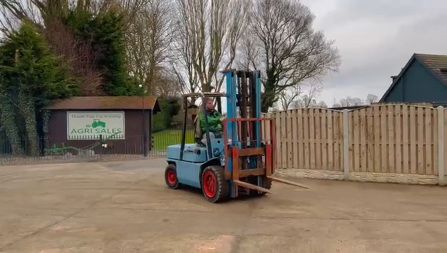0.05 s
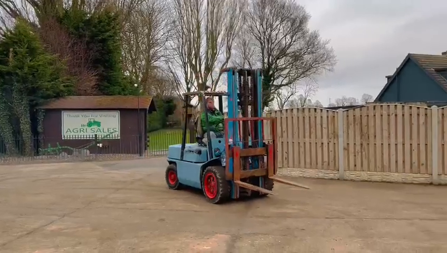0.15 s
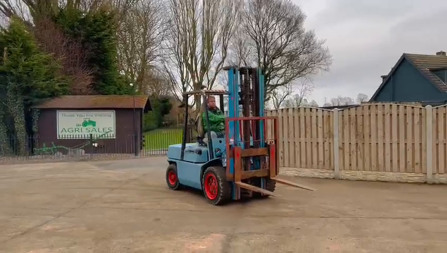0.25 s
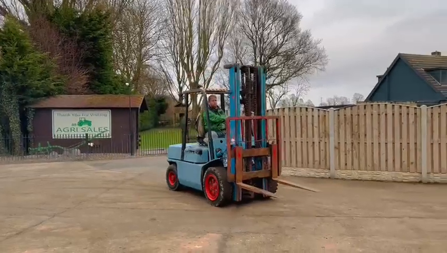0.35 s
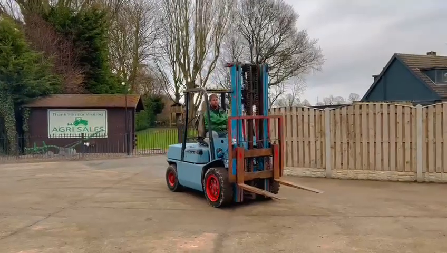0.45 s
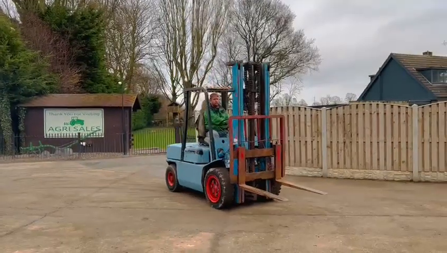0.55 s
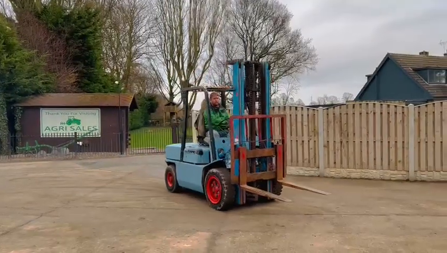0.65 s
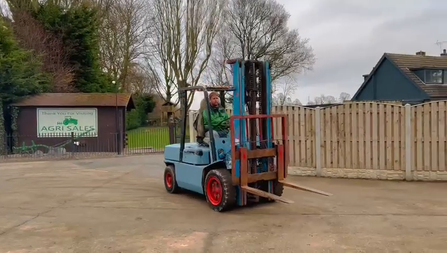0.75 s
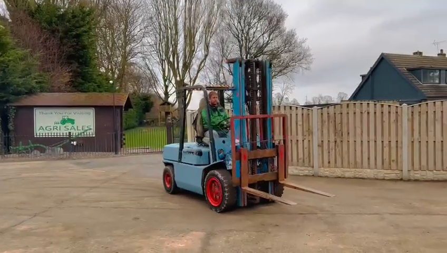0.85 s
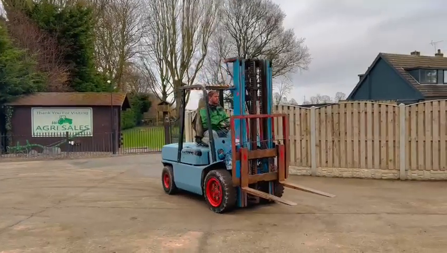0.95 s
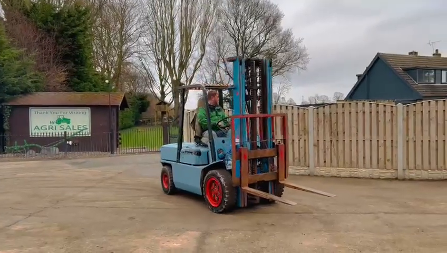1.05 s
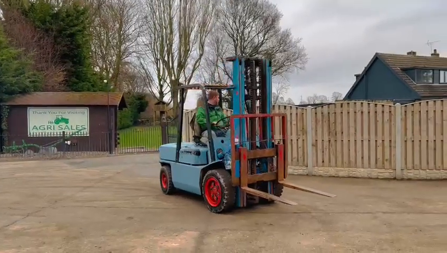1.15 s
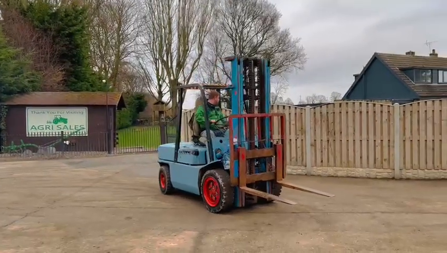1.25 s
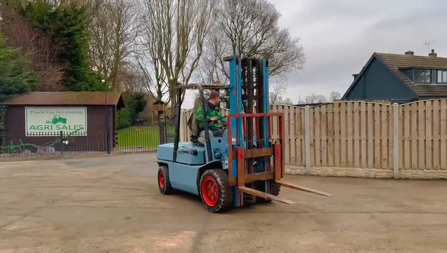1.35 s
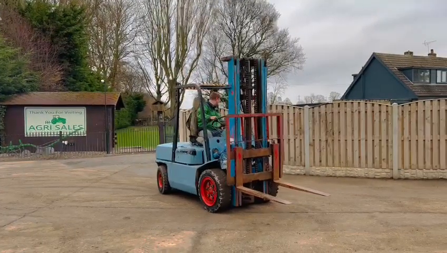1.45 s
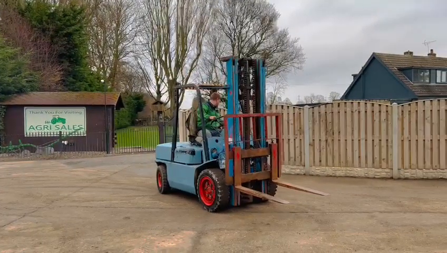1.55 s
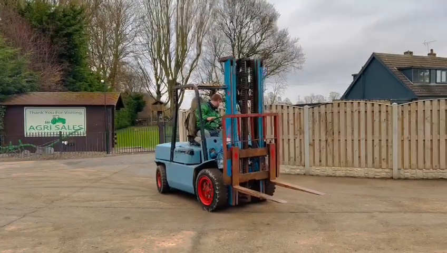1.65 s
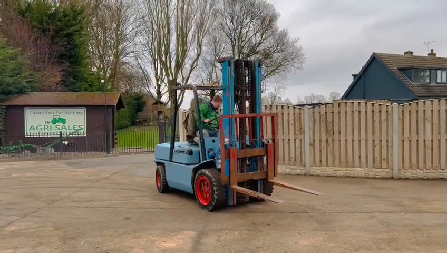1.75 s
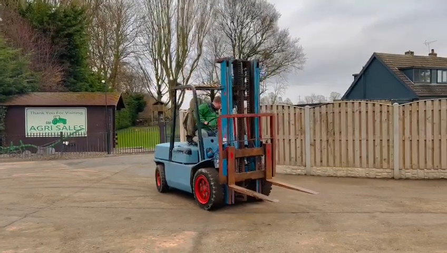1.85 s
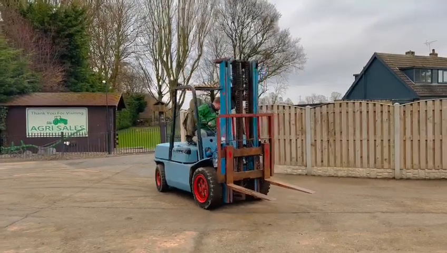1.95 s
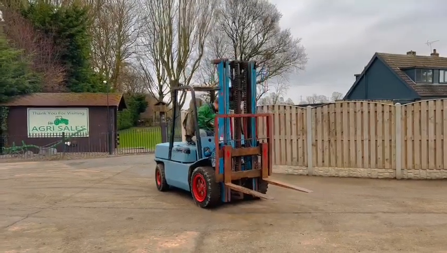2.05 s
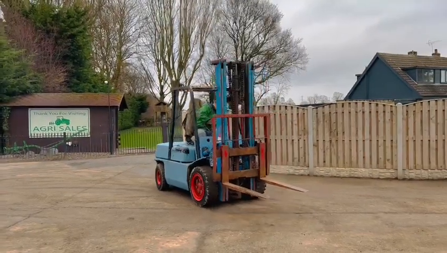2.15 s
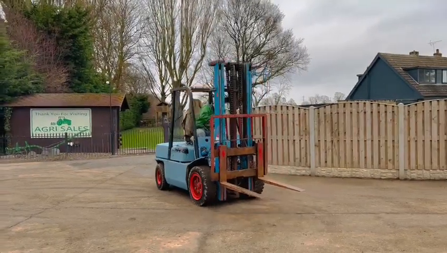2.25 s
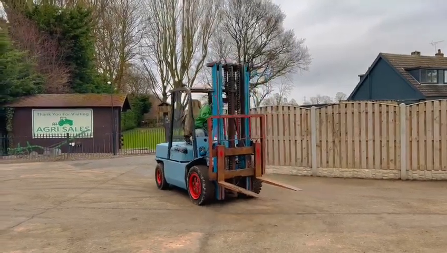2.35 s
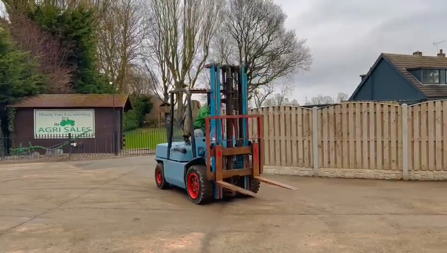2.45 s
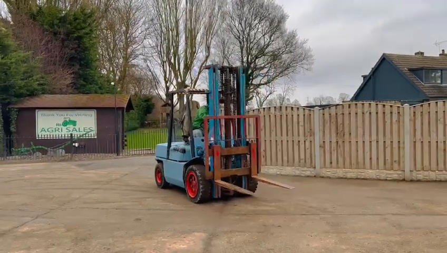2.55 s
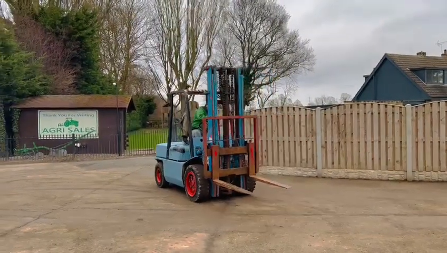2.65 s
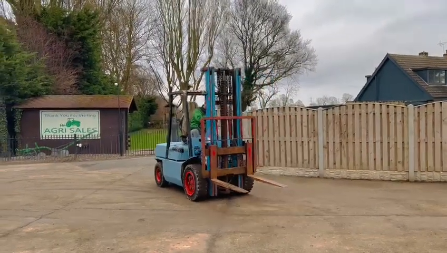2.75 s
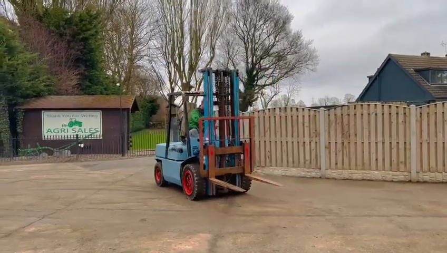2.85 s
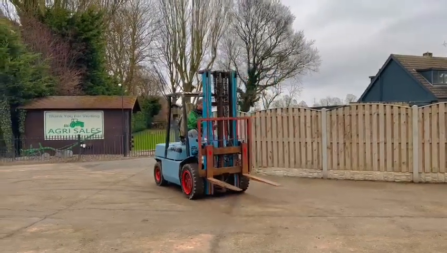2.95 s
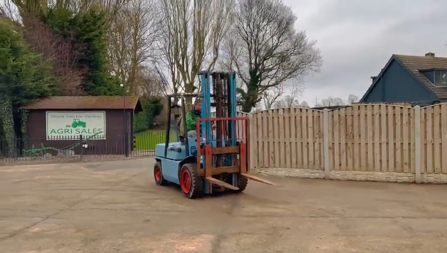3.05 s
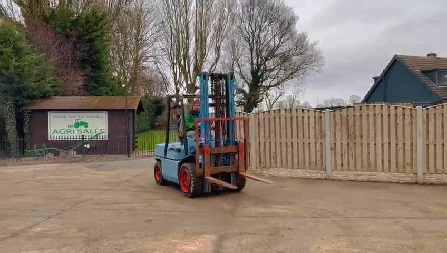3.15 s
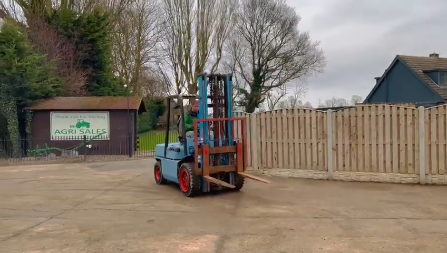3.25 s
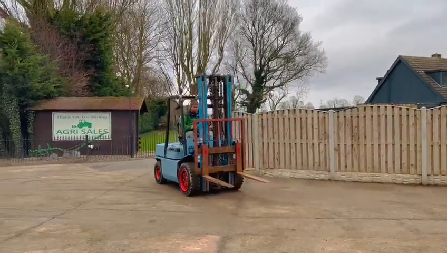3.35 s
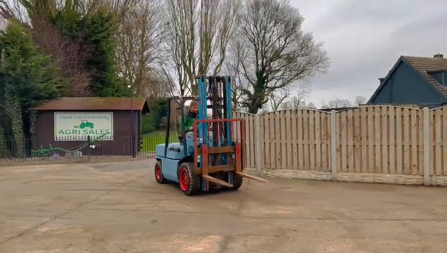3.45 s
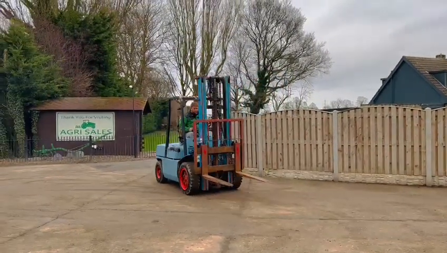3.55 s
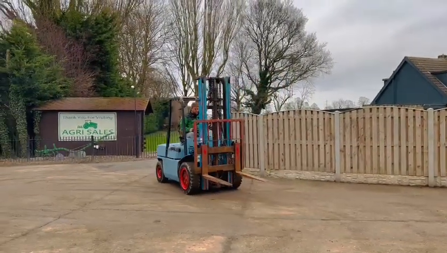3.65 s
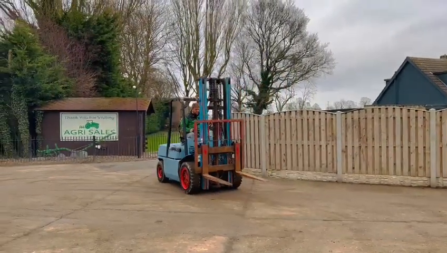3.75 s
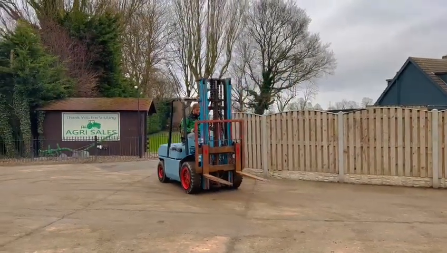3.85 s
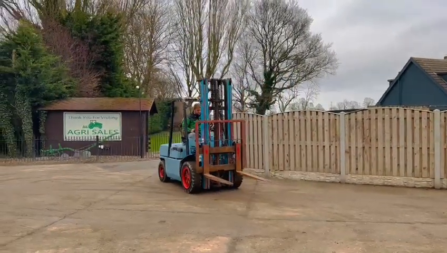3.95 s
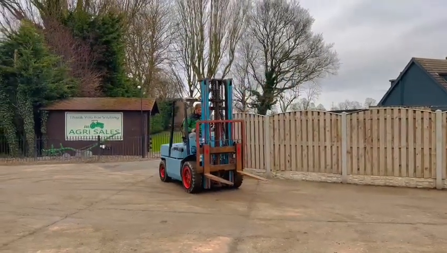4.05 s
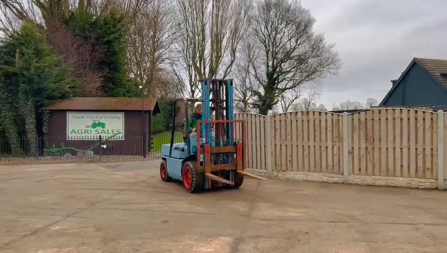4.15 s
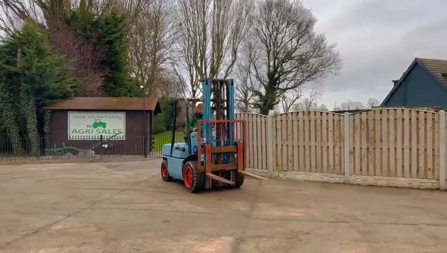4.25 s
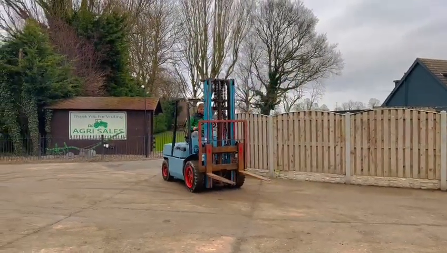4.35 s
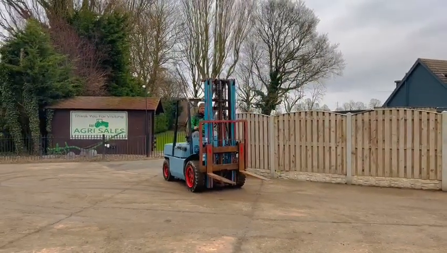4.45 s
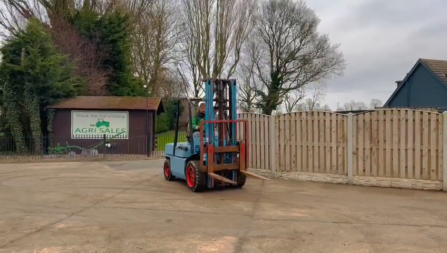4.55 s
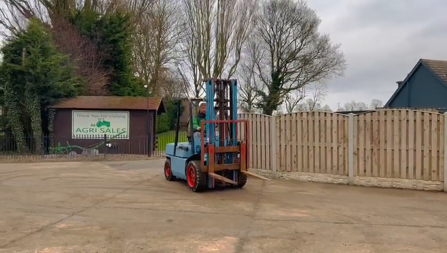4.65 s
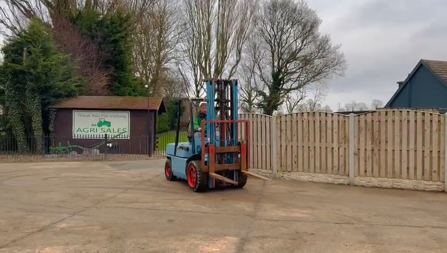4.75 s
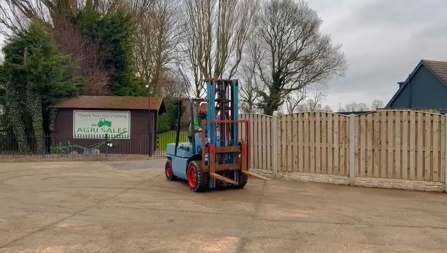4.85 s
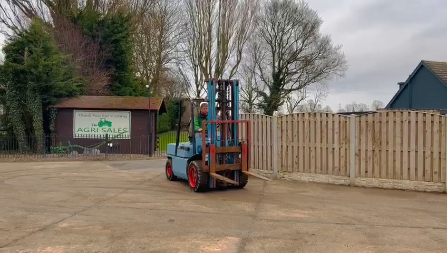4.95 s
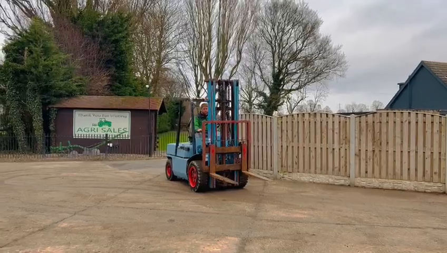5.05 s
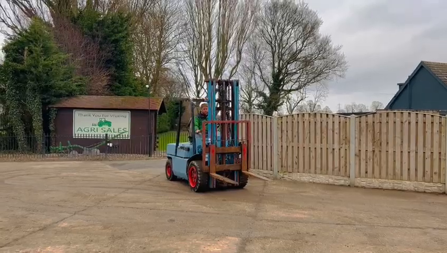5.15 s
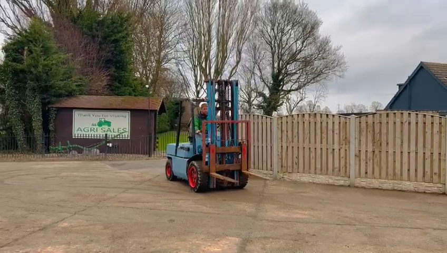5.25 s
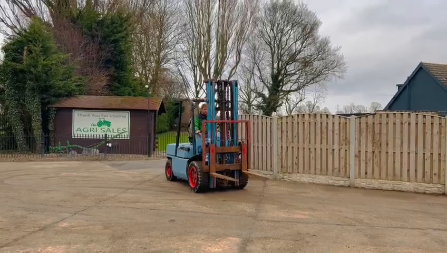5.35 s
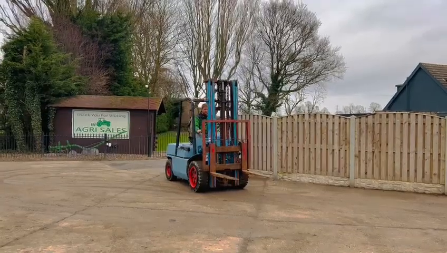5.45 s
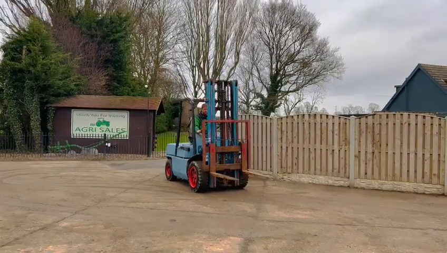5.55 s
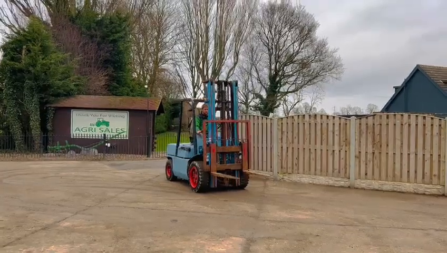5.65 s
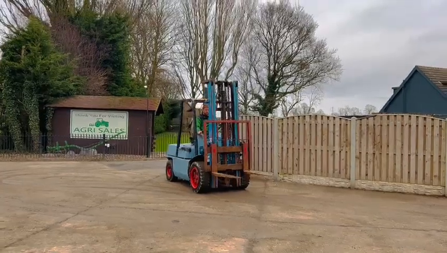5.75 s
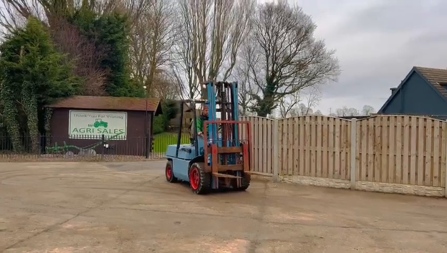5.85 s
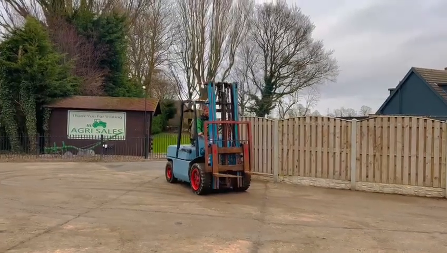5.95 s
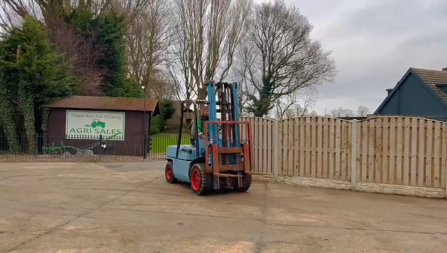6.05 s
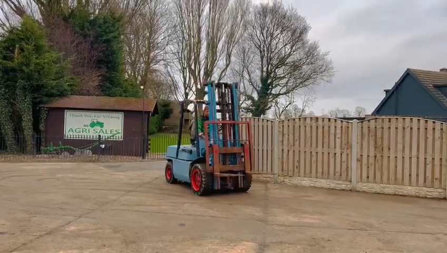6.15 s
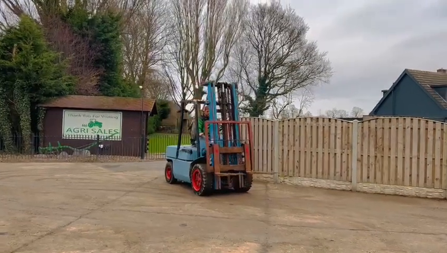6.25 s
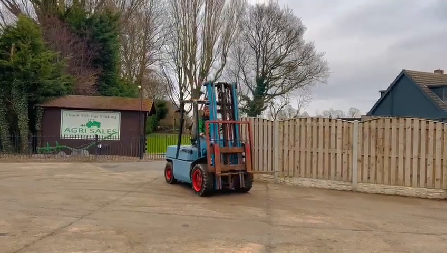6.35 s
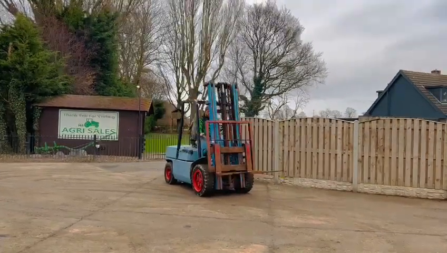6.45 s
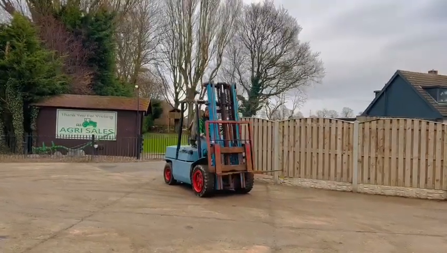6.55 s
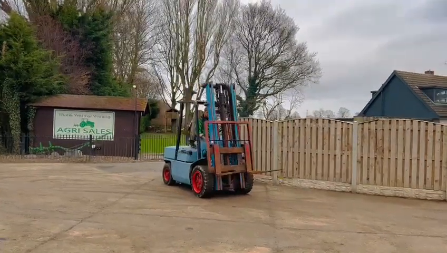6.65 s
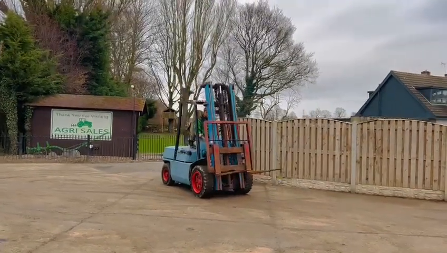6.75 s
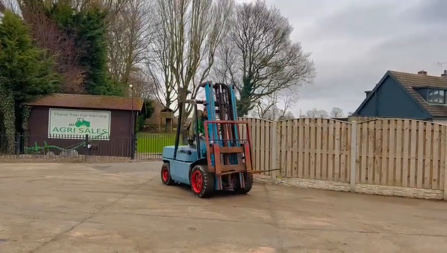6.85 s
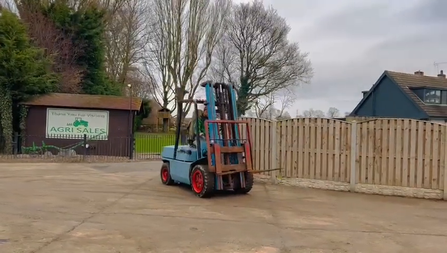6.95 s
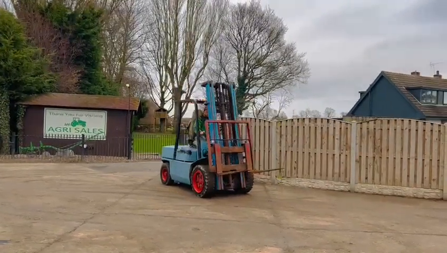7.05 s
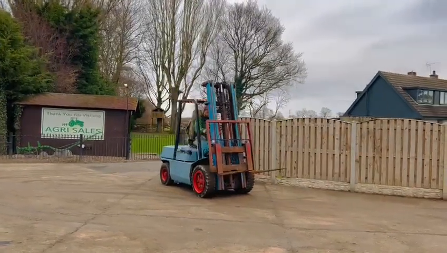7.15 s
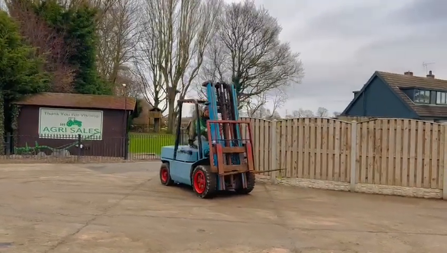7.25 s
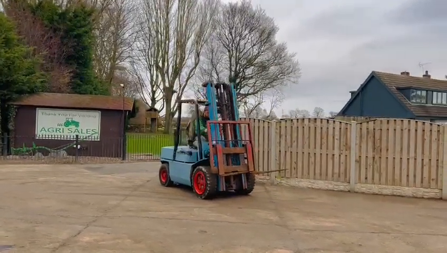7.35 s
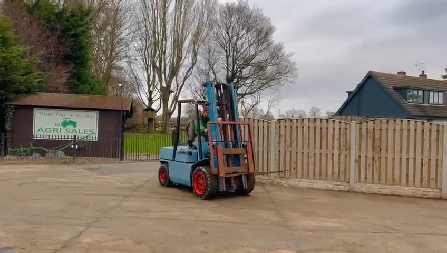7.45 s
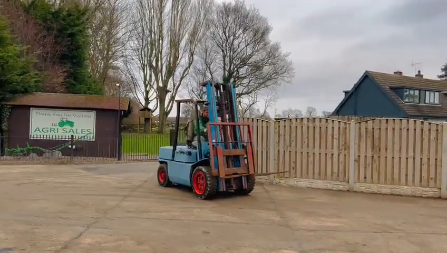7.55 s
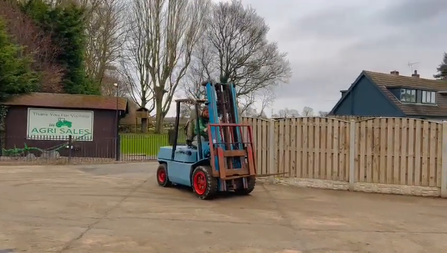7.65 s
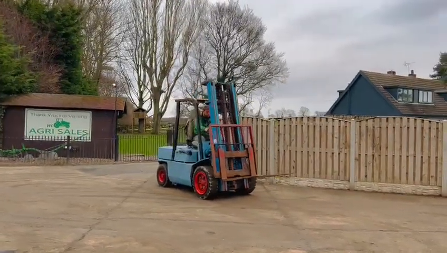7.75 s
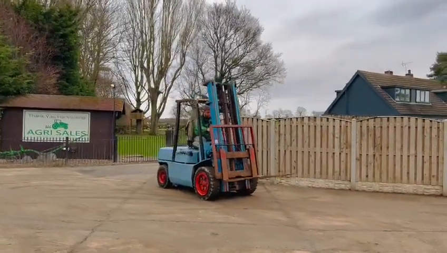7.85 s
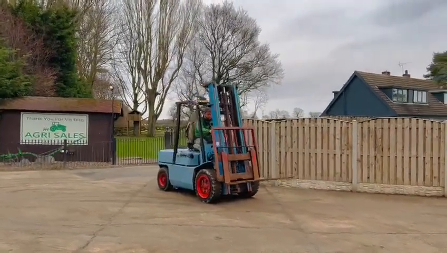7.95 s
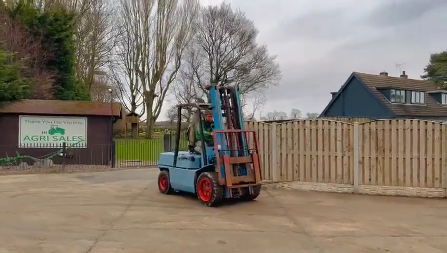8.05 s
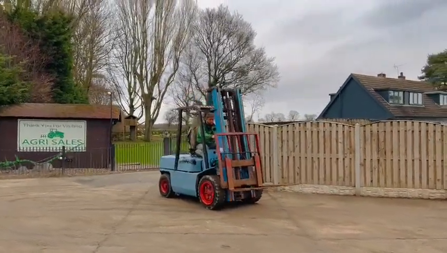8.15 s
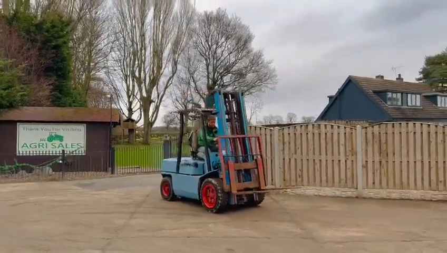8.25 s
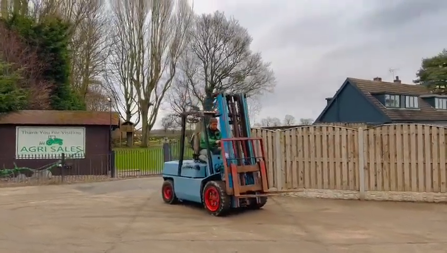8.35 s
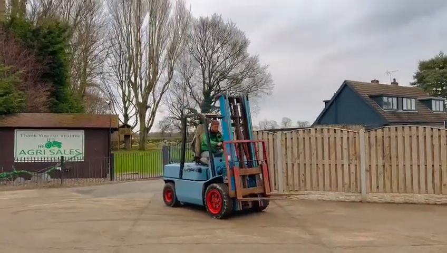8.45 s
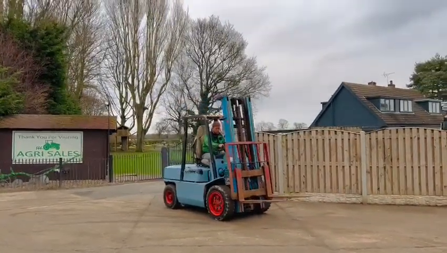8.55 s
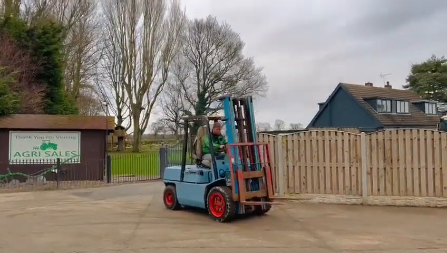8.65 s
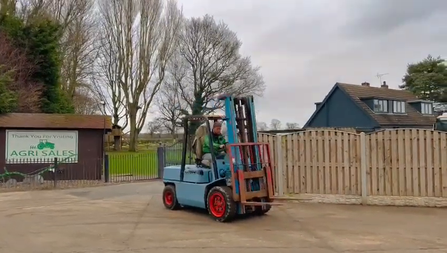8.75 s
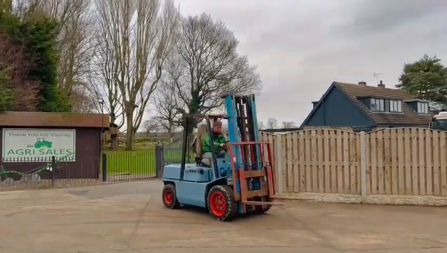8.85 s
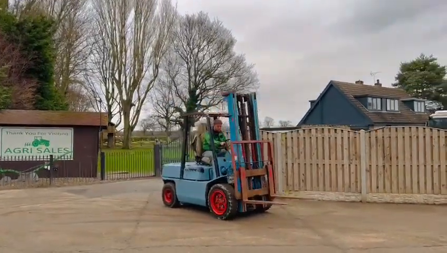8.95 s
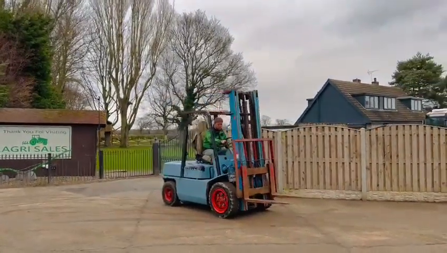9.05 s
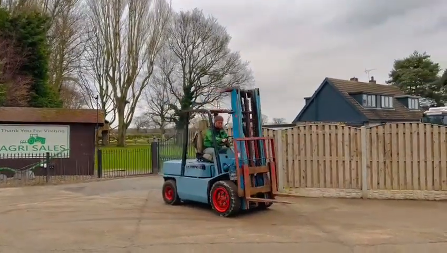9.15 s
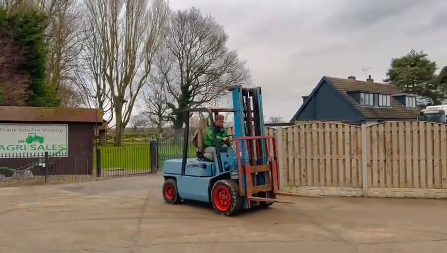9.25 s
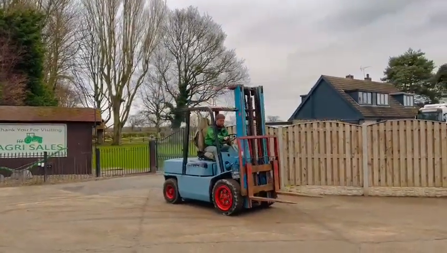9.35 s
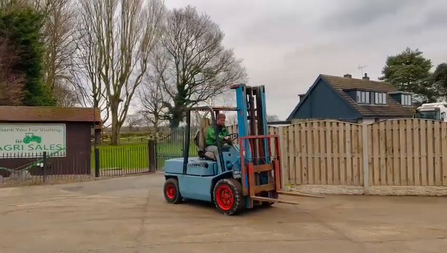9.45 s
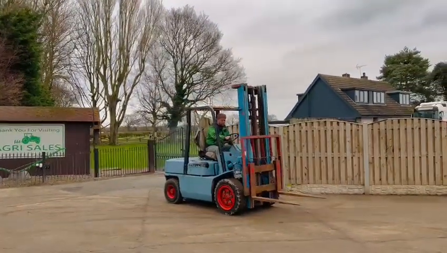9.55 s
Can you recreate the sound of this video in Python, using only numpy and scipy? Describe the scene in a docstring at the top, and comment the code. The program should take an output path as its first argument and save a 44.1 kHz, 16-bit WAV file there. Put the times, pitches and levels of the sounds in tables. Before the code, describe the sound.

Four-cylinder diesel truck engine booming and rattling outdoors, revs falling to a throbbing idle midway, then roaring up with metallic mast clunks.

```python
"""Concrete yard: a four-cylinder diesel forklift shunts a few metres away, revs, drops to idle, pulls away.
One crank curve times every engine layer. Exhaust: firing harmonics that boom, and puffs through pipe
and drum resonances that throb. Knock, clatter and rasp: volleys of contacts and noise bursts through
resonances or spectra, levels set by speed and fuel. A pump whines faintly; levers and chains click,
mast and forks clunk; decaying noise echoes the metal off concrete, fence and shed; steady air noise."""
import sys
import numpy as np
from scipy import signal
from scipy.fft import rfft, irfft, next_fast_len
from scipy.io import wavfile
from scipy.ndimage import uniform_filter1d, map_coordinates

SR = 44100
rng = np.random.default_rng(int(sys.argv[2]) if len(sys.argv) > 2 else 0)


def bounce(signal):
    """Save signal as a 16-bit WAV file at the path given by the first command-line argument."""
    frames = np.transpose(np.atleast_2d(signal))
    limited = np.clip(frames, -1, 1)
    pcm = np.round(limited * 32767).astype(np.int16)
    wavfile.write(sys.argv[1], SR, pcm)


N = 424241

# pedal turning points, before flywheel smoothing: (time [s], speed [firings/s])
PEDAL_SPEED = [(0.0, 23.5), (0.482, 51.8), (0.761, 39.26), (1.109, 55.33), (1.573, 44.02), (1.949, 54.18),
               (2.387, 46.6), (2.85, 52.4), (2.96, 33.5), (3.1, 28), (3.24, 17.5), (3.38, 28), (3.504, 32),
               (3.748, 22.76), (3.96, 29.4), (4.06, 27.5), (4.78, 27.46), (5.085, 57.7), (5.268, 66.61),
               (5.512, 42.77), (5.711, 50.33), (5.884, 47.94), (6.725, 49.49), (7.096, 44.52),
               (7.368, 65.91), (8.003, 57.68), (8.339, 44.78), (8.829, 54.21), (9.309, 48.08),
               (9.62, 50.88)]
FLYWHEEL_S, WORKING_FIRINGS_PER_S = .11, 50
# cylinders in firing order: (exhaust puff [dB], puff lag [firings], knock [dB])
CYLINDERS = [(-1.2, 0, .7), (1.6, .04, -.6), (2.4, -.005, .4), (-5.5, .02, -.4)]
START_FIRINGS, STRONG_AT_FIRINGS = 1.45, 1.7  # crank angle at the start; angle of strongest boom

# exhaust load, swells under load and sinks on the overrun: (time [s], relative level [dB])
EXHAUST_LOAD = [(0.0, -27.5), (0.13, -13.5), (0.4, -15), (0.65, -16.5), (0.9, -13.5), (2.81, -15),
                (2.91, -23.5), (3.04, -20), (3.24, -36), (3.46, -15), (3.67, -31.5), (3.92, -25),
                (4.78, -24.5), (4.87, -16.5), (5.2, -13), (5.42, -18.5), (5.6, -16), (7.25, -14.5),
                (7.65, -19), (8.1, -16.5), (8.6, -15.5), (9.62, -14.5)]
# firing note, set by speed: (speed [firings/s], relative level [dB])
FIRING_NOTE = [(28, -53), (40, -38), (46, -28.5), (50, -24), (55, -19), (60, -17.5), (65, -14.5)]
# exhaust split: (speed [firings/s], harmonics 2, 3, 4, 5 [dB re load], throb [dB re load])
PIPE_SHARES = [(27, -3.5, -19, -22, -24, 0), (33, -6, -15, -11, -17, -2.5), (39, -6.5, -7, -7, -16, -4),
               (44, -4.5, -7, -7, -17, -6.5), (47, -3.5, -7.5, -6, -17, -8.5),
               (50, -3.5, -4.5, -17, -22, -9.5), (54, -5.5, -2.5, -18, -23, -10),
               (58, -3, -11, -20, -24, -7), (61, -1, -17, -22, -25, -6), (65, -10, -2.5, -22, -26, -6)]
# swing of each harmonic over four firings: (harmonics 1 to 5 [dB])
HARMONIC_LOPE_DB = (1, 1.3, 2.2, 2.8, 2.5)
# truck backs and swings its tailpipe round: (start [s], end [s])
TURN_S = (3.5, 5.5)
# harmonic change once turned: (harmonics 1 to 5 [dB])
TURN_DB = (0.5, -3, 1.5, -6, 1)
# upper harmonics: gain per octave/s of speed change, and the limit on that rate
SURGE_DB_S_PER_OCTAVE, SURGE_LIMIT_OCTAVES_PER_S = .9, 4
HARMONIC_WAVER_DB, HARMONIC_WAVER_KNOTS_PER_S = .8, 6
GAS_DB = -16  # turbulence between puffs
# exhaust pipe and silencer: (frequency [Hz], width [Hz], level [dB])
PIPE_MODES = [(66, 21, 1.5), (125.8, 18.7, 6), (138.3, 29, 3.5), (192.2, 14.7, 5), (234, 17.5, -0.5),
              (307, 40, -16.5)]
# silencer drum, rings on at idle: (frequency [Hz], width [Hz], level [dB])
DRUM_MODES = [(112, 22, -3), (150, 26, -2.5), (187, 20, 1)]

# fuel, as injection rasp: (time [s], relative level [dB])
FUEL = [(0.0, -48), (0.37, -30.5), (0.72, -44.5), (1.0, -29.5), (1.36, -41), (1.8, -33), (2.2, -39.5),
        (2.82, -37), (2.89, -47), (3.08, -54.5), (3.29, -52), (3.4, -43.5), (3.6, -50.5), (4.81, -51.5),
        (4.86, -39), (4.99, -31.5), (5.12, -26), (5.24, -36.5), (5.5, -43), (5.65, -37), (5.9, -35.5),
        (7.1, -35), (7.27, -29), (7.45, -40), (8.2, -42), (8.57, -34.5), (9.15, -42), (9.62, -36.5)]
WORKING_FUEL_DB, FULL_KNOCK_FUEL_DB, FULL_FUEL_DB = -38, -39, -28  # steady; hardest knock; full pedal
# sump: (frequency [Hz], width [Hz], level [dB])
SUMP_MODES = [(300, 50, -2.5), (440, 85, -1), (555, 70, 0)]
# engine block: (frequency [Hz], width [Hz], level [dB])
BLOCK_MODES = [(603, 36, -2), (768, 28, 1), (825, 40, -7), (874, 38, 4.5)]
# engine cover: (frequency [Hz], width [Hz], level [dB])
COVER_MODES = [(1185, 70, -1), (1272, 58, 2.5), (1385, 70, -3)]
# overhead guard, buzzes at idle: (frequency [Hz], width [Hz], level [dB])
GUARD_MODES = [(385, 18, 0), (586, 28, 0)]
# sump: (level at working speed and fuel [dB], speed slope [dB/octave], fuel slope [dB/dB])
SUMP_LAW = (-31.7, 10.5, 0.35)
# block: (level at working speed and fuel [dB], speed slope [dB/octave], fuel slope [dB/dB])
BLOCK_LAW = (-28.2, 6, 0.4)
# cover: (level at working speed and fuel [dB], speed slope [dB/octave], fuel slope [dB/dB])
COVER_LAW = (-30.5, 6.3, 0.39)
# clatter: (level at working speed and fuel [dB], speed slope [dB/octave], fuel slope [dB/dB])
CLATTER_LAW = (-30.5, 2.9, 0.7)
# cover buzz as the truck swings its flank round: (time [s], extra level [dB])
FLANK = [(0, -1), (2.8, -3.5), (5.3, -6.5), (6.9, -3), (7.3, 1), (8.1, 1), (8.9, -3), (9.62, 1)]

# combustion clatter spectrum: (frequency [Hz], relative level [dB])
CLATTER_SPECTRUM = [(200, -25), (420, 3), (1000, 3.5), (1450, 1.5), (1650, 9), (1950, 0.5), (2700, -3.5),
                    (3300, -15), (4500, -50.5), (9000, -66.5)]
# injector rasp spectrum: (frequency [Hz], relative level [dB])
RASP_SPECTRUM = [(1500, -36), (2800, -5), (3300, 7.5), (4300, -1.5), (5200, 0), (6100, -1.5), (6900, -14),
                 (7800, -1.5), (8900, -17.5)]
# manifold, resonances summed and the sum applied twice: (frequency [Hz], width [Hz], level [dB])
MANIFOLD_MODES = [(2313, 390, -1.5), (2760, 450, -0.5)]
CLATTER_WAVER_DB, ROAR_DB_PER_FUEL_DB = 1, .5
# band cancelled by the bounce off concrete, lower as the truck nears: (time [s], frequency [Hz])
GROUND_DIP = [(0, 1650), (6.9, 1650), (7.3, 1430), (8.4, 1440), (9.0, 1320), (9.62, 1370)]
DIP_DB, DIP_SIGMA_HZ = -8, 65

# concrete, fence and shed echo: (frequency [Hz], T60 [s])
YARD_T60 = [(100, 0.16), (600, 0.16), (3000, 0.095), (9000, 0.12)]
# scattered side sound: (frequency [Hz], gain [dB])
SIDE_GAIN = [(150, -28), (300, -17), (450, -12), (700, -10), (1400, -10), (2600, -7), (4500, -5),
             (7000, -9), (8500, -6)]
# stereo lean: (frequency [Hz], left minus right [dB])
PORT_LEAN = [(400, 0), (700, 2), (1150, 5), (1600, 0), (2600, -1), (5000, 5), (7000, .5)]
# right port delay behind left: (frequency [Hz], delay [s])
PORT_LAG = [(300, 0), (750, .00017), (1400, .0001), (2000, .00045)]
TOP_HZ = 9050

# lever and chain clicks: (time [s], relative level [dB])
CLICKS = [(0.057, -29), (0.2924, -19), (1.59, -38.5), (3.392, -36), (4.833, -25), (4.936, -21.5)]
# click spectrum: (frequency [Hz], relative level [dB])
CLICK_SPECTRUM = [(600, -10.5), (2000, 13), (5000, 3.5), (9000, -8), (11500, -37.5)]
# mast and fork jolts: (time [s], relative level [dB])
CLUNKS = [(3.193, -16), (3.635, -22), (3.69, -22), (5.315, -14), (5.344, -11), (5.39, -14), (5.452, -15),
          (5.626, -17), (7.016, -9.5), (8.112, -14)]
# mast modes: (frequency [Hz], mean level [dB], T60 [s])
MAST_MODES = [(315, -4, .09), (385, -3, .11), (430, -1, .1), (490, -1, .09), (610, -5, .07), (900, -9, .05),
              (1300, -13, .04)]


def amp(db):
    """Decibels to gain."""
    return 10 ** (np.asarray(db) / 20)


def unit(x):
    """Scale to rms 1."""
    return x / np.sqrt(np.mean(x ** 2) + 1e-20)


def along(points, hz):
    """Interpolate (frequency [Hz], value) points on a log frequency axis."""
    f, v = np.transpose(points)
    return np.interp(np.log(hz + 1), np.log(f + 1), v)


def curves(rows):
    """One per-sample curve for each column after the time."""
    s, *cols = np.transpose(rows)
    return [np.interp(np.arange(N) / SR, s, c) for c in cols]


def wobble(knots_per_s):
    """Smooth random curve."""
    knots = rng.standard_normal(int(N * knots_per_s / SR) + 4)
    return map_coordinates(knots, [np.arange(N) * knots_per_s / SR], order=2)


def filtered(x, response):
    """Apply a complex frequency response by FFT."""
    m = next_fast_len(N + SR // 2)
    return irfft(rfft(x, m) * response(np.fft.rfftfreq(m, 1 / SR)), m)[..., :N]


def body(modes, f):
    """Causal sum of damped resonances, alternating in sign."""
    total = 0
    for k, (centre, width, db) in enumerate(modes):
        damping = 1j * f * width
        total = total + (-1) ** k * amp(db) * damping / (centre * centre - f * f + damping)
    return total


def crank_speed():
    """Firings per second: pedal ramps, rounded by the flywheel as a moving average."""
    return uniform_filter1d(curves(PEDAL_SPEED)[0], int(FLYWHEEL_S * SR), mode="nearest")


def lope(firings, depth_db, peak_at):
    """Gain that swells once every four firings."""
    return amp(depth_db * np.cos(np.pi / 2 * (firings - peak_at)))


def bursts(firings, decay, steady):
    """Noise flaring at each firing, as hard as its cylinder knocks; rms 1."""
    strength = amp(np.interp(firings, np.arange(4), np.array(CYLINDERS)[:, 2], period=4))
    age = firings % 1
    flare = np.exp(-age / decay) - np.exp(-4 * age / decay)
    return unit(strength * (steady + 2 * flare) * rng.standard_normal(N))


def exhaust_levels(speed):
    """Five harmonic levels and throb level [dB], from speed, load and acceleration."""
    load_db, = curves(EXHAUST_LOAD)
    speeds, *shares = np.transpose(PIPE_SHARES)
    *upper_db, throb_db = [load_db + np.interp(speed, speeds, share) for share in shares]
    first_db = np.interp(speed, *np.transpose(FIRING_NOTE))
    octaves_per_s = np.gradient(np.log2(speed)) * SR
    limit = SURGE_LIMIT_OCTAVES_PER_S
    surge_db = SURGE_DB_S_PER_OCTAVE * np.clip(octaves_per_s, -limit, limit)
    turned = np.interp(np.arange(N) / SR, TURN_S, [0, 1])
    levels_db = [first_db] + [db + surge_db for db in upper_db]
    harmonics_db = [db + turn_db * turned + HARMONIC_WAVER_DB * wobble(HARMONIC_WAVER_KNOTS_PER_S)
                    for db, turn_db in zip(levels_db, TURN_DB)]
    return harmonics_db, throb_db


def exhaust(firings, speed, harmonics_db, throb_db, width_firings=.0023, reflect=.12, round_trip_s=.01703):
    """Loping boom on the firing harmonics, plus unequal puffs ringing pipe and silencer."""
    n = np.round(firings).astype(int)
    size_db, lag, _ = np.array(CYLINDERS)[n % 4].T
    size_db = size_db + .5 * rng.standard_normal(n[-1] + 1)[n]
    # fixed crank angle per puff: softer at idle
    puffs = amp(size_db) * np.exp(-.5 * ((firings - n - lag) / width_firings) ** 2)

    # the even swing makes the boom; the rest throbs
    turns = [np.exp(2j * np.pi * k * firings) for k in range(1, len(harmonics_db) + 1)]
    swing = puffs.mean() + sum(2 * np.real(np.mean(puffs / z) * z) for z in turns)
    gas = amp(GAS_DB) * np.sqrt(SR / 600) * bursts(firings, decay=.89, steady=.49)

    def pipe_response(f):
        echoes = 1 / (1 - reflect * np.exp(-2j * np.pi * f * round_trip_s))
        return body(PIPE_MODES, f) * echoes / (1 + 1j * f / 450) ** 2

    def drum_response(f):
        return body(DRUM_MODES, f) / (1 + 1j * f / 450) ** 2

    throb = unit(filtered(unit((puffs - swing) * np.sqrt(speed)) + gas, pipe_response))
    # slow puffs leave the drum time to ring
    drum = unit(filtered(unit(puffs * np.sqrt(speed)) + gas, drum_response))
    idling = .85 * np.clip((42 - speed) / 12, 0, 1)

    # each harmonic takes the pipe's phase at its pitch
    hz = np.arange(1, 400)
    shift = np.exp(1j * np.angle(body(PIPE_MODES, hz)))
    boom = 0
    for k, (db, depth_db, z) in enumerate(zip(harmonics_db, HARMONIC_LOPE_DB, turns), 1):
        tone = np.sqrt(2) * np.real(z * np.interp(k * speed, hz, shift))
        boom = boom + amp(db) * lope(firings, depth_db, STRONG_AT_FIRINGS) * tone
    return boom + amp(throb_db) * ((1 - idling) * throb + idling * drum)


def impulses(firings, angles, sizes):
    """Pulse of each size where the crank passes each angle [firings]."""
    at = np.interp(angles.ravel(), firings, np.arange(N), left=N, right=N)
    return np.bincount(np.round(at).astype(int), sizes.ravel(), N + 1)[:N]


def impacts(firings, spread, scatter, loose_db, gap_share, count):
    """Volley of metal contacts per firing, nearly repeating every four firings; rms 1."""
    n = np.arange(int(firings[-1]) + 1)
    cylinder = n % 4
    # half follow combustion closely; valves and gears fill the time between
    between = np.arange(count) % 2
    delay = np.where(between, rng.random((4, count)), spread * rng.exponential(size=(4, count)))
    sign = rng.choice([-1, 1], (4, count))
    size = sign * np.where(between, gap_share, 1) * amp(np.array(CYLINDERS)[:, 2:])
    angles = n[:, None] + delay[cylinder] + scatter * rng.standard_normal((len(n), count))
    sizes = size[cylinder] * amp(loose_db * rng.standard_normal(angles.shape))
    return unit(impulses(firings, angles, sizes) / np.sqrt(np.gradient(firings)))


def metal_level(law, speed, fuel_db):
    """Metal layer level [dB], growing with speed and injected fuel."""
    working_db, octave_db, fuel_share = law
    octaves = np.log2(speed / WORKING_FIRINGS_PER_S)
    return working_db + octave_db * octaves + fuel_share * (fuel_db - WORKING_FUEL_DB)


def knock(firings, speed, fuel_db, guard_db=-39):
    """Firings strike the block, shaking sump, cover and, at idle, guard resonances."""
    n = np.arange(int(firings[-1]) + 1)
    stroke_db = np.array(CYLINDERS)[n % 4, 2] + 1.5 * rng.standard_normal(len(n))
    strokes = unit(impulses(firings, n + .1, amp(stroke_db)) / np.sqrt(speed))
    blows = impacts(firings, spread=.35, scatter=.001, loose_db=.9, gap_share=1.1, count=56)
    blows = blows + .25 * bursts(firings, decay=.3, steady=1.2)
    # crank and oil churn in the sump
    churn = impacts(firings, spread=.3, scatter=.006, loose_db=1.5, gap_share=1, count=40)
    churn = churn + .4 * bursts(firings, decay=.4, steady=1.2)

    # each part but the sump answers most to its nearest cylinder, so lopes once a cycle
    block_drive = (blows + .5 * strokes) * lope(firings, 1, .2)
    cover_drive = (blows + .7 * strokes) * lope(firings, 1.6, .2)
    guard_drive = (.5 * churn + strokes) * lope(firings, 3, 1.9)
    sump = unit(filtered(churn, lambda f: body(SUMP_MODES, f) * (1j * f / (220 + 1j * f)) ** 2))
    block = unit(filtered(block_drive, lambda f: body(BLOCK_MODES, f) / (1 + (f / 1050) ** 8)))
    cover = unit(filtered(cover_drive, lambda f: body(COVER_MODES, f) / (1 + (f / 1900) ** 4)))
    guard = unit(filtered(guard_drive, lambda f: body(GUARD_MODES, f) / (1 + 1j * f / 600)))

    # collapses on fuel cut; extra fuel does not harden it
    knock_fuel_db = np.minimum(fuel_db, FULL_KNOCK_FUEL_DB)
    sump_db = metal_level(SUMP_LAW, speed, knock_fuel_db)
    block_db = metal_level(BLOCK_LAW, speed, knock_fuel_db)
    cover_db = metal_level(COVER_LAW, speed, knock_fuel_db) + curves(FLANK)[0]
    idling = np.clip((40 - speed) / 10, 0, 1) * np.interp(fuel_db, [-56, -52], [0, 1])
    engine = amp(sump_db) * sump + amp(block_db) * block + amp(cover_db) * cover
    return engine + amp(guard_db) * idling * guard


def clatter(firings, clatter_db, rasp_db, sizzle_db=-3.5, roar_db=-4, advance_firings=.24):
    """Sudden combustion ticks; injectors rasp just ahead of it; fuel makes the manifold roar."""
    ticks = impacts(firings, spread=.3, scatter=.001, loose_db=1.5, gap_share=1.1, count=60)
    ticks = unit(ticks + .7 * bursts(firings, decay=.2, steady=1.6))
    injection = firings + advance_firings
    rattle = impacts(injection, spread=.35, scatter=.002, loose_db=1.5, gap_share=1, count=70)
    sizzle = (.9 * bursts(injection, decay=.2, steady=1.3) + rattle) * lope(firings, 1.3, 3)
    low = unit(filtered(ticks, lambda f: amp(along(CLATTER_SPECTRUM, f))))
    high = unit(filtered(sizzle, lambda f: amp(along(RASP_SPECTRUM, f))))
    roar = unit(filtered(sizzle, lambda f: body(MANIFOLD_MODES, f) ** 2))
    low_db = clatter_db + CLATTER_WAVER_DB * wobble(15)
    high_db = rasp_db + sizzle_db + CLATTER_WAVER_DB * wobble(23)
    roar_level_db = rasp_db + roar_db + ROAR_DB_PER_FUEL_DB * (rasp_db - FULL_FUEL_DB)
    return amp(low_db) * low + amp(roar_level_db) * roar + amp(high_db) * high


def machinery(firings, speed, fuel_db):
    """Knock and clatter, less the band cancelled by the bounce off the concrete."""
    clatter_db = metal_level(CLATTER_LAW, speed, fuel_db)
    x = knock(firings - .3, speed, fuel_db) + clatter(firings, clatter_db, fuel_db)
    hz, t, z = signal.stft(x, SR, nperseg=1024)
    centre_hz = np.interp(t, *np.transpose(GROUND_DIP))
    dip = np.exp(-.5 * ((hz[:, None] - centre_hz) / DIP_SIGMA_HZ) ** 2)
    return signal.istft(z * amp(DIP_DB * dip), SR, nperseg=1024)[1][:N]


def whine(firings, speed, level_db, tone_db=-12, cycles_per_firing=18):
    """Crank-driven pump tone, loudest where it meets a block resonance."""
    resonance = np.abs(body(BLOCK_MODES, cycles_per_firing * speed))
    tone = resonance * np.sin(2 * np.pi * cycles_per_firing * firings + .5 * wobble(40))
    return amp(level_db + tone_db + 1.2 * wobble(19)) * unit(tone)


def yard(x):
    """Scattered echo off concrete, fence and shed: decaying noise, level evened across pitch."""
    hz, t, z = signal.stft(rng.standard_normal(SR // 3), SR, nperseg=256)
    t60 = along(YARD_T60, hz)[:, None]
    tail = signal.istft(z * amp(-60 * t / t60) / np.sqrt(t60), SR, nperseg=256)[1]
    return signal.oaconvolve(x, tail / np.linalg.norm(tail))[:N]


def ports(f):
    """Level and arrival-time difference between two microphone ports."""
    half = np.array([[.5], [-.5]])
    return amp(half * along(PORT_LEAN, f)) * np.exp(2j * np.pi * half * f * along(PORT_LAG, f))


def air(level_db=-44):
    """Steady open-air noise, strongest around 1 kHz, independent left and right."""
    spectrum = [(15, -6), (45, -6), (200, -20.5), (1000, 2.5), (8000, -48)]  # (frequency [Hz], level [dB])
    return amp(level_db) * unit(filtered(rng.standard_normal((2, N)), lambda f: amp(along(spectrum, f))))


def clicks(click_db=-7, t60_s=.12):
    """Levers and chains: short decaying noise, spectrally shaped."""
    t = np.arange(SR // 2) / SR
    x = np.zeros(N + SR)
    for s, db in CLICKS:
        x[round(s * SR):][:len(t)] += amp(db + click_db - 60 * t / t60_s) * rng.standard_normal(len(t))
    return filtered(x[:N], lambda f: amp(along(CLICK_SPECTRUM, f)))


def clunks(ring_db=-4, thud_db=4, thud_t60_s=.24):
    """Mast and fork jolts: dull decaying modes plus a resonant noise thud."""
    t = np.arange(SR // 2) / SR
    rings, thuds = np.zeros((2, N + SR))
    rise = 1 - np.exp(-t / .003)
    for s, db in CLUNKS:
        ring = 0
        for hz, level_db, t60 in MAST_MODES:
            decay = amp(level_db + rng.normal(0, .83) - 60 * t / t60)
            ring = ring + decay * np.sin(2 * np.pi * (hz * t + rng.random()))
        ring = ring * rise
        thud = amp(db + thud_db - 60 * t / thud_t60_s) * rise * rng.standard_normal(len(t))
        start = round(s * SR)
        rings[start:][:len(t)] += amp(db + ring_db) * ring / np.abs(ring).max()
        thuds[start:][:len(t)] += thud
    thud_modes = [(430, 330, 0), (1100, 1200, -8)]  # (frequency [Hz], width [Hz], level [dB])
    return rings[:N] + filtered(thuds[:N], lambda f: body(thud_modes, f) / (1 + 1j * f / 2500))


def scene(echo_db=-10, pipe_side_db=-26):
    """One crank drives every engine layer; bass central, metal spread across the yard."""
    speed = crank_speed()
    firings = START_FIRINGS + np.cumsum(speed) / SR
    fuel_db, = curves(FUEL)
    bumps = clicks() + clunks()
    pump = whine(firings, speed, metal_level(BLOCK_LAW, speed, fuel_db))
    metal = machinery(firings, speed, fuel_db) + pump + bumps
    mid = metal + amp(echo_db) * yard(metal)
    # a second, independent rattle widens the metal; only clicks and clunks return as side echo
    side = filtered(machinery(firings, speed, fuel_db) + yard(bumps), lambda f: amp(along(SIDE_GAIN, f)))
    pipe = exhaust(firings, speed, *exhaust_levels(speed))
    # faint exhaust echo, opposite in left and right
    pipe = pipe + amp(pipe_side_db) * np.outer([1, -1], yard(pipe))
    return filtered(np.array([mid + side, mid - side]), ports) + pipe + air()


def record(dry):
    """Keep nothing at or above the band limit."""
    return filtered(dry, lambda hz: hz < TOP_HZ)


dry = scene()
out = record(dry)
bounce(out)
```